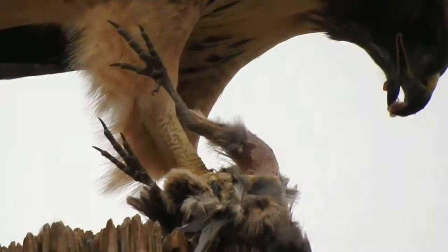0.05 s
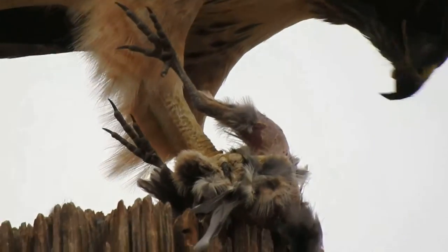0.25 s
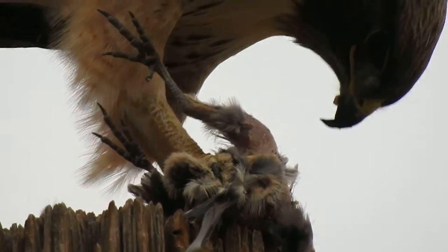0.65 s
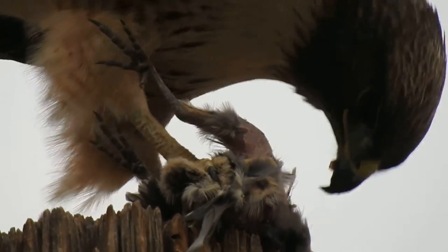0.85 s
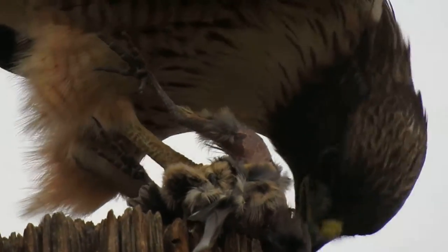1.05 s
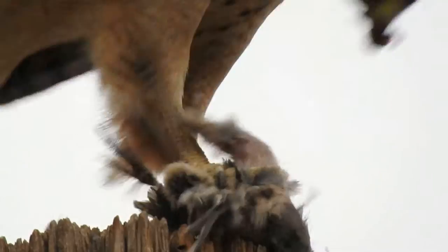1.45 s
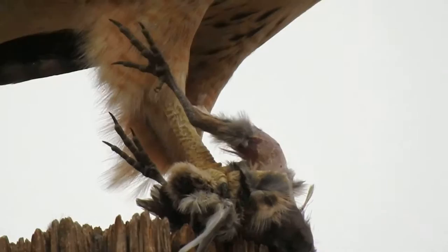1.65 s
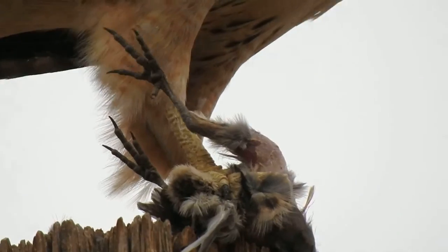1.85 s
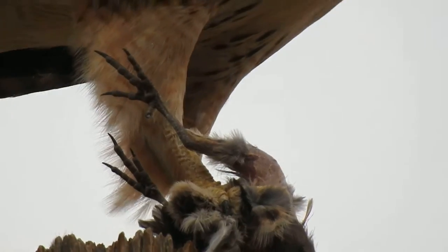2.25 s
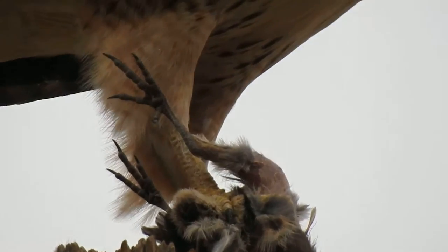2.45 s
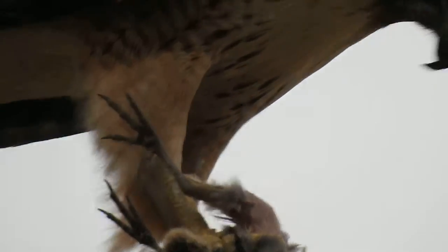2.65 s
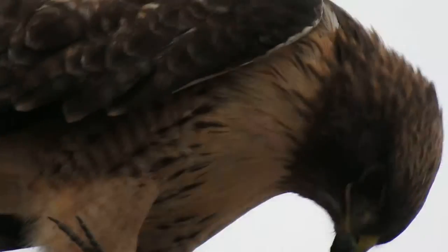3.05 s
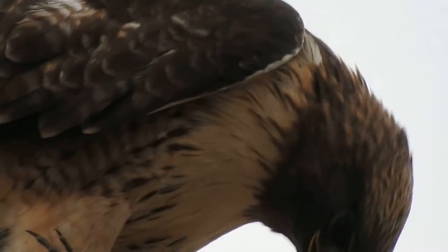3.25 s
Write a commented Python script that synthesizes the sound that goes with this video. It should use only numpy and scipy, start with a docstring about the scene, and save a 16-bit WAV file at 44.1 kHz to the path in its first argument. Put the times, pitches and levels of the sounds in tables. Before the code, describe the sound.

A small bird chips outdoors with a slight echo. Faint chips come at the start and 0.4 seconds, with short hoarse nasal calls at 0.2 and 0.7. Louder, sharp high chips follow at about 1.0, 1.3, 1.7, 2.2 and 2.5 seconds, then a softer one at 2.8. Distant traffic rumbles steadily throughout, with a low engine drone and faint hiss.

```python
"""A small bird scolds in sharp high chips: upswept whistles with sidebands and rasp from its syrinx.
Between them come two hoarse nasal calls (rough harmonics through a climbing throat resonance),
a faint thin whistle and soft rustles. Trees and houses echo all of these.
Distant traffic rumbles throughout under a faint hiss, with one engine droning in it."""
import sys
import numpy as np
from scipy import signal
from scipy.fft import rfft, irfft
from scipy.io import wavfile

SR = 44100
rng = np.random.default_rng(int(sys.argv[2]) if len(sys.argv) > 2 else 0)


def unload_audio(sound):
    """Save the sound as a 16-bit wav file, at the path given as the first command line argument."""
    columns = np.transpose(np.atleast_2d(sound))
    # keep every value between -1 and 1, then stretch to whole-number steps
    steps = np.round(np.clip(columns, -1, 1) * 32767)
    wavfile.write(sys.argv[1], SR, steps.astype(np.int16))


N = 145530
T = np.arange(N) / SR
SIDE = np.array([[1], [-1]])  # left, right in antiphase


def undb(db):
    """Decibels to gain."""
    return 10 ** (np.asarray(db) / 20)


def unit(x):
    """Scale to rms 1."""
    return x / np.sqrt(np.mean(x ** 2))


def noise(spectrum):
    """Noise of rms 1 shaped by (f/Hz, level/dB) points."""
    hz, db = np.array(spectrum).T
    f = np.maximum(np.arange(N // 2 + 1) * SR / N, 1)
    shape = undb(np.interp(np.log(f), np.log(hz), db))
    return unit(irfft(rfft(rng.standard_normal(N)) * shape, N))


def wander(rate_hz):
    """Smooth random motion of rms 1, bandwidth about rate_hz."""
    f = np.arange(N // 2 + 1) * SR / N
    return unit(irfft(rfft(rng.standard_normal(N)) * np.exp(-(f / rate_hz) ** 2), N))


def phase_of(hz):
    """Phase/rad of a moving pitch."""
    return 2 * np.pi * np.cumsum(hz) / SR


def swell(start_s, length_s, attack, release):
    """Rounded envelope; attack and release are shares of the length."""
    along = (T - start_s) / length_s
    rise = np.sin(np.pi / 2 * np.clip(along / attack, 0, 1)) ** 2
    fall = np.sin(np.pi / 2 * np.clip((1 - along) / release, 0, 1))
    return rise * fall


def pan(x, left_db):
    """Mono to stereo by level difference."""
    return x * undb(SIDE * left_db / 2)


# Syrinx rasp spectrum: f/Hz, level/dB
RASP_SPECTRUM = [(1500, -33.5), (3000, -18), (4000, -12.5), (5000, -5), (6000, 8), (6800, -2.5),
                 (7700, -11.5), (8600, -26.5), (9400, -37.5), (12000, -57)]
# Chips: t/s, length/s, top f/Hz, upsweep/oct, level/dB, sideband spacing/Hz,
# lower sideband/dB, upper sideband/dB, rasp/dB
CHIP_NOTES = [(-.012, 0.022, 6100, 0.069, -38, 1720, -28, -41, -18),
              (.378, 0.034, 6480, .02, -46, 1490, 7.5, -29, -7),
              (1.019, .034, 6505, 0.22, -19, 1787, -20.5, -32, -15),
              (1.311, 0.031, 6902, .10, -16.5, 1755, -15, -37.5, -17),
              (1.723, 0.0294, 6413, .14, -17.5, 1638, -22, -37, -17.5),
              (2.194, 0.023, 6257, 0.063, -19, 1750, -18, -30.5, -22.5),
              (2.477, .023, 6372, 0.089, -18.5, 1810, -26, -39, -26),
              (2.822, 0.021, 6390, .04, -29, 1470, -21.5, -20, -15.5)]


def chips():
    """Each whistle sweeps up, then sags; a slower vibration of the syrinx adds sidebands and rasp."""
    rise_s, sag_oct = 0.00716, 0.024
    rasp = noise(RASP_SPECTRUM)
    pitch_jitter = 1 + 0.00943 * wander(498)
    spacing_jitter = 1 + 0.0284 * wander(430)
    out = 0
    for start_s, length_s, top_hz, sweep_oct, db, spacing_hz, lower_db, upper_db, rasp_db in CHIP_NOTES:
        age_s = np.clip(T - start_s, 0, length_s)
        bend_oct = -sweep_oct * np.exp(-(age_s / rise_s) ** 2 / 2) - sag_oct * (age_s / length_s) ** 4
        carrier = phase_of(top_hz * pitch_jitter * 2 ** bend_oct)
        slow = phase_of(spacing_hz * spacing_jitter)
        sidebands = undb(lower_db) * np.sin(carrier - slow) + undb(upper_db) * np.sin(carrier + slow)
        voice = np.sqrt(2) * (np.sin(carrier) + sidebands)
        envelope = swell(start_s, length_s, attack=1, release=0.69)
        out += undb(db) * (voice * envelope ** 0.8 + undb(rasp_db) * rasp * envelope ** 0.5)
    flutter_db = 3 * wander(160)
    return pan(out * undb(flutter_db), left_db=0)


# Engine rumble and tyre roar spectra: f/Hz, level/dB
RUMBLE_SPECTRUM = [(20, -55), (35, -28), (48, -13.5), (62, -0.5), (85, -3), (112, -0.5), (138, -9),
                   (180, -4), (230, -10), (330, -34), (700, -52.5)]
TYRE_SPECTRUM = [(100, -16), (220, -2), (295, -0.5), (360, -1.5), (450, 0.5), (600, 2), (800, -0.5),
                 (1060, -5), (1560, -18), (2200, -35), (4000, -63)]
# Rumble and tyre roar over time: t/s, level/dB
RUMBLE_LEVELS = [(0, -39.5), (.8, -40.5), (1.6, -39.5), (2.3, -40.5), (3.3, -39.5)]
TYRE_LEVELS = [(0, -41.5), (.6, -42.5), (1.3, -41), (1.9, -41.5), (2.6, -41.5), (3.3, -40.5)]


def traffic():
    """Far engines and tyres, nearly alike in both ears; a house front reflects the tyre roar."""
    wall_s, wall_db = 0.006687, -13.5
    rumble = noise(RUMBLE_SPECTRUM) * undb(np.interp(T, *np.array(RUMBLE_LEVELS).T))
    tyres = noise(TYRE_SPECTRUM) * undb(np.interp(T, *np.array(TYRE_LEVELS).T) + 0.8 * wander(9))
    reflection = undb(wall_db) * np.interp(T - wall_s, T, tyres)
    width = undb(-56) * noise([(25, -17), (70, 2.5), (160, 6), (300, -5.5), (700, -2),
                               (1200, -8.5), (2200, -19.5), (6000, -38.5)])
    return pan(rumble + tyres + reflection, left_db=-0.615) + SIDE * width


# Background hiss spectrum: f/Hz, level/dB
AIR_SPECTRUM = [(1500, -12), (2300, -1), (4000, 5.5), (8000, 1), (10000, -4.5), (13000, -17.5),
                (15700, -37)]


def air():
    """A faint, wide, steady hiss."""
    width = undb(-62.5) * noise([(1500, -18), (2500, -10.5), (4500, -0.5), (8000, -5.5),
                                 (11000, -12), (15700, -17.5)])
    return undb(-63) * noise(AIR_SPECTRUM) + SIDE * width


# Engine drone: t/s, firing f/Hz, fundamental level/dB, octave level/dB
ENGINE_DRONE = [(0, 77.14, -49.5, -59), (.45, 78.8, -49, -39), (1.3, 79.5, -45.5, -45),
                (2.1, 77.3, -45.5, -45.5), (2.7, 76.54, -49.5, -48.5), (3.3, 78.4, -45, -54)]


def engine():
    """A distant engine drones on its firing rate and the octave."""
    times_s, firing_hz, fundamental_db, octave_db = np.array(ENGINE_DRONE).T
    phase = phase_of(np.interp(T, times_s, firing_hz) * (1 + 0.008 * wander(18)))
    return sum(unit(np.sin(k * phase)) * undb(np.interp(T, times_s, db) + 2.1 * wander(4.6))
               for k, db in ((1, fundamental_db), (2, octave_db)))


# Call hiss spectrum: f/Hz, level/dB
CALL_HISS_SPECTRUM = [(800, -20), (1800, 4.5), (2300, -7), (3600, -16.5), (5800, 12.5), (7100, -22),
                      (8300, -26.5), (12000, -47)]
# Hoarse calls: t/s, length/s, middle f/Hz, glide/oct, level/dB, first throat f/Hz, last throat f/Hz
HOARSE_NOTES = [(0.177, 0.117, 836, -.09, -41, 3170, 4420), (0.723, 0.1224, 954.7, .04, -34.5, 2100, 5810)]


def hoarse_calls():
    """Rough harmonics through a throat resonance that climbs as the bill opens; each cycle pulses hiss."""
    settle_share, open_share = 0.36, 0.63
    half_width_hz, flutter_db, hiss_db = 695, 2.5, -9
    orders = np.arange(2, 9)
    out = 0
    for start_s, length_s, hz, glide_oct, db, first_hz, last_hz in HOARSE_NOTES:
        along = np.clip((T - start_s) / length_s, 0, 1)
        jitter = 0.016 + 0.035 * np.exp(-(along / settle_share) ** 2)  # a scrape settles into a pitch
        roughness = 1 + jitter * (wander(436) + 0.5 * wander(77.9))
        phase = phase_of(hz * 2 ** (glide_oct * (along - 0.5)) * roughness)
        throat_hz = first_hz + (last_hz - first_hz) * np.minimum(along / open_share, 1) ** 0.91
        harmonic_hz = hz * orders[:, None]
        resonance = 1 / np.hypot(1, (harmonic_hz - throat_hz) / half_width_hz)
        gains = resonance / (1 + (harmonic_hz / 7200) ** 16)
        gains /= np.sqrt(np.sum(gains ** 2, axis=0) / 2)
        voice = sum(gain * np.sin(k * phase) * undb(flutter_db * wander(270))
                    for k, gain in zip(orders, gains))
        hiss = undb(hiss_db) * unit(noise(CALL_HISS_SPECTRUM) * (1 + np.cos(phase)))
        envelope = swell(start_s, length_s, attack=0.85, release=0.84) ** 0.67
        out += undb(db) * (voice + hiss) * envelope
    return pan(out, left_db=-1.1)


def thin_whistle():
    """One faint, slightly unsteady note."""
    pitch_hz = 5560 * (1 + 0.007 * wander(600))
    envelope = swell(start_s=0.984, length_s=0.03, attack=0.3, release=0.3)
    return undb(-48) * unit(np.sin(phase_of(pitch_hz))) * envelope


# Rustles: t/s, length/s, centre f/Hz, level/dB
RUSTLE_BURSTS = [(1.228, 0.079, 3550, -65), (1.492, 0.032, 5940, -55.5), (2.583, .09, 2200, -66)]


def rustles():
    """Brief soft swishes of fluttering band noise."""
    out = 0
    for start_s, length_s, hz, db in RUSTLE_BURSTS:
        band = noise([(hz / 2, -30), (hz / 1.2, -3), (hz, 0), (hz * 1.001, -7.5), (hz * 2, -30)])
        flutter_db = 3 * wander(120)
        out += undb(db + flutter_db) * band * swell(start_s, length_s, attack=0.54, release=0.53)
    return out


def with_echoes(x, wet_db, width):
    """Add quick scatter from nearby branches and walls, then a longer faint tail."""
    gap_s = 0.0063
    age_s = np.arange(SR) / SR
    onset = np.clip(age_s / gap_s - 1, 0, 1)
    response = 0
    for db, t60_s in ((3.5, 0.2), (-7, 0.4)):
        mid, side = rng.standard_normal((2, SR)) * undb(-60 * age_s / t60_s) * onset
        tail = mid + width * SIDE * side
        response += undb(db + wet_db) * tail / np.sqrt(np.sum(tail ** 2) / 2)
    return x + signal.fftconvolve(x, response, axes=1)[:, :N]


def scene():
    """Echoing birds and rustles over the traffic."""
    whistled = with_echoes(chips() + thin_whistle(), wet_db=0, width=0.81)
    rough = with_echoes(hoarse_calls() + rustles(), wet_db=-1.2, width=0.49)
    return whistled + rough + traffic() + air() + engine()


def record(dry):
    """Steep low-pass on the top treble."""
    cutoff_hz = 15700
    return signal.sosfilt(signal.ellip(10, 0.1, 80, cutoff_hz, fs=SR, output="sos"), dry)


dry = scene()
out = record(dry)
unload_audio(out)
```